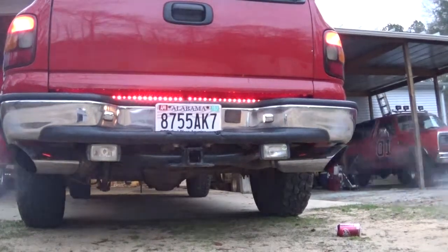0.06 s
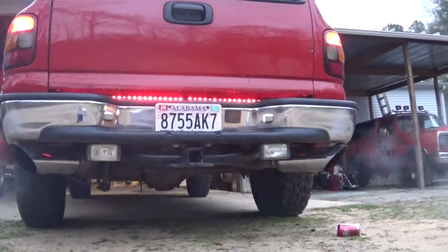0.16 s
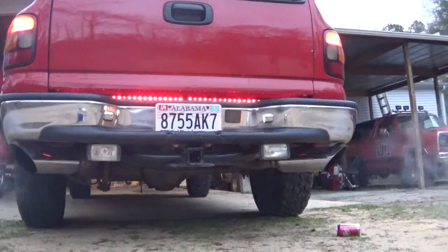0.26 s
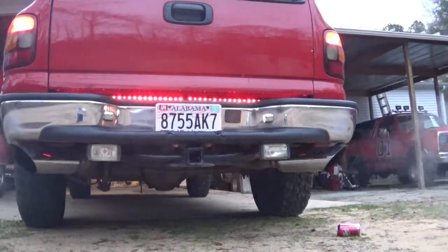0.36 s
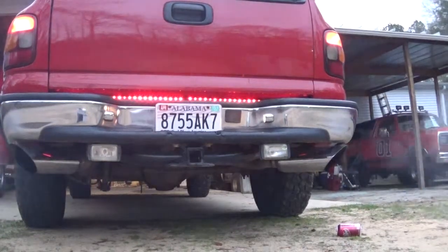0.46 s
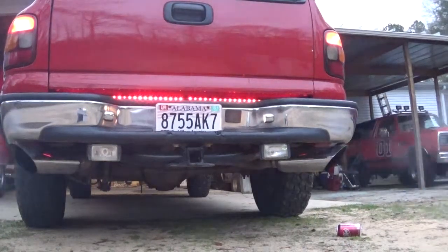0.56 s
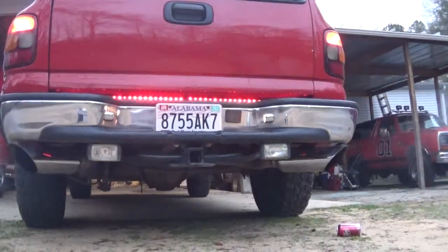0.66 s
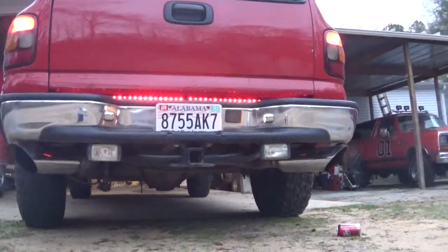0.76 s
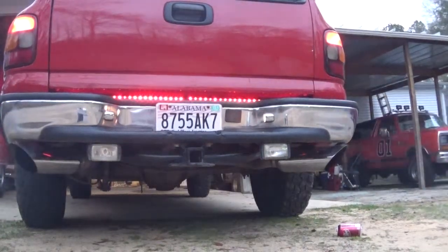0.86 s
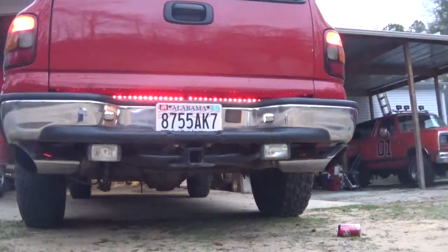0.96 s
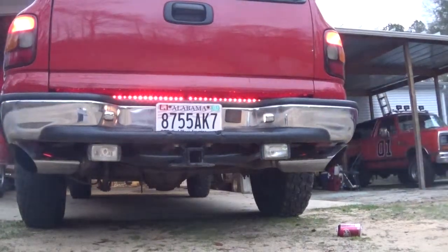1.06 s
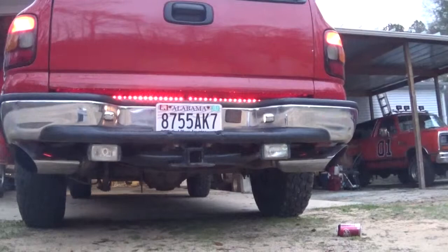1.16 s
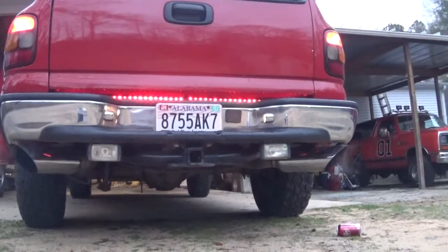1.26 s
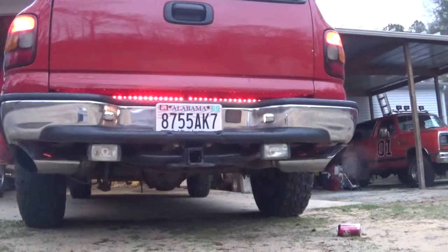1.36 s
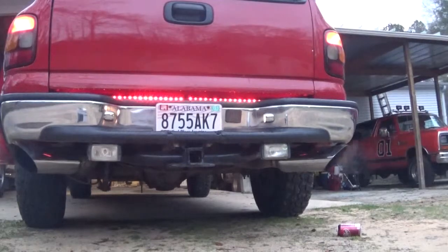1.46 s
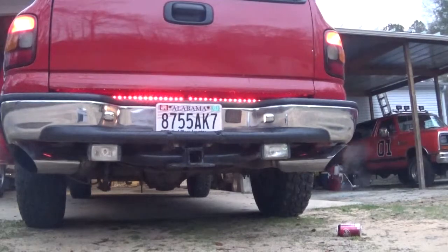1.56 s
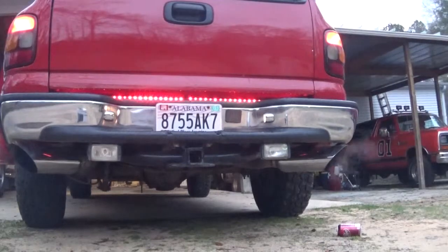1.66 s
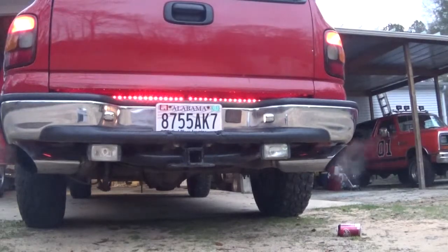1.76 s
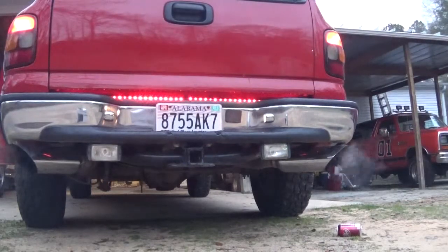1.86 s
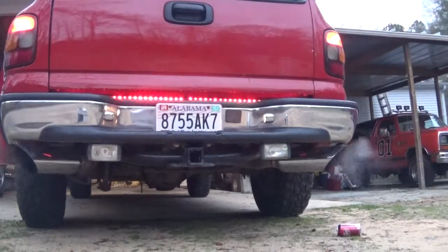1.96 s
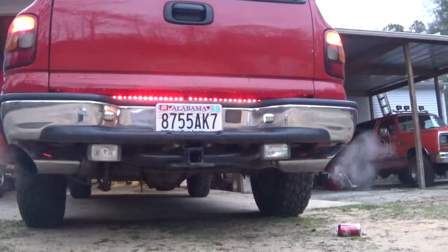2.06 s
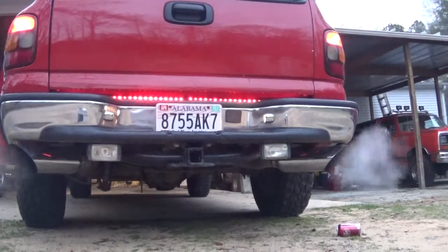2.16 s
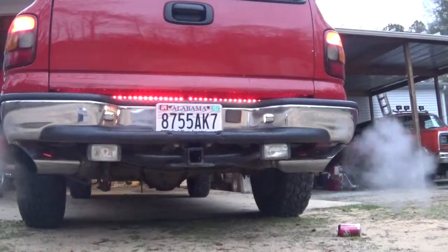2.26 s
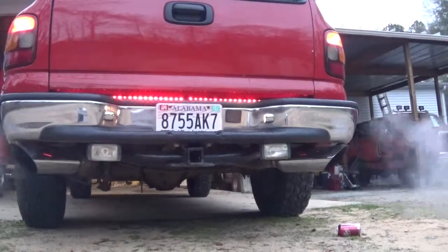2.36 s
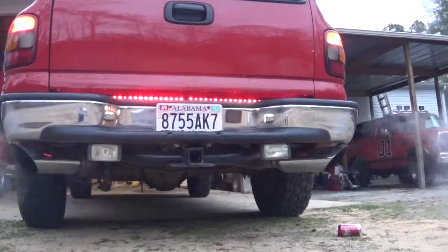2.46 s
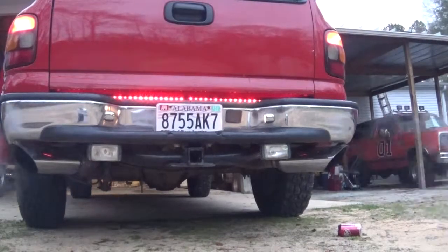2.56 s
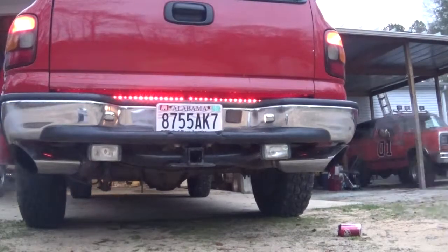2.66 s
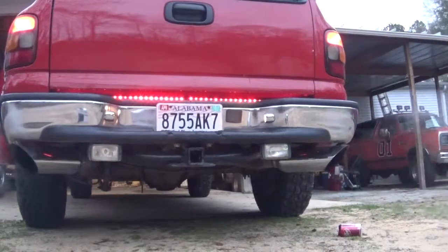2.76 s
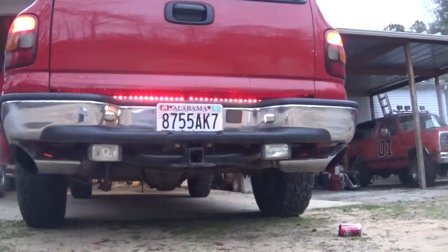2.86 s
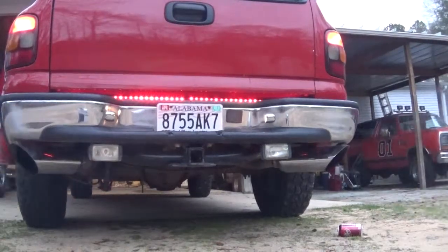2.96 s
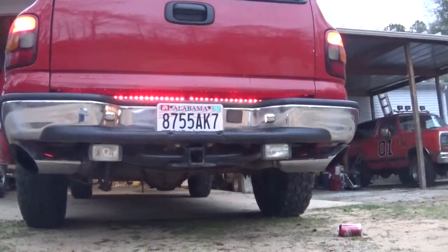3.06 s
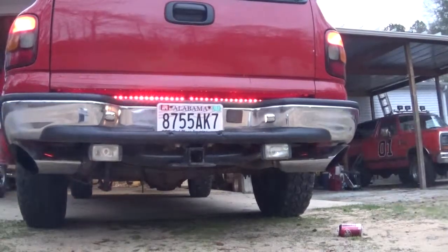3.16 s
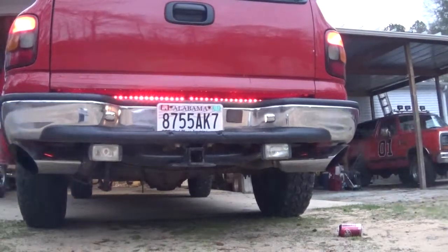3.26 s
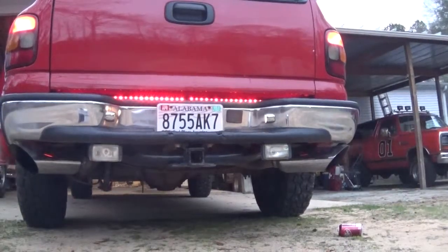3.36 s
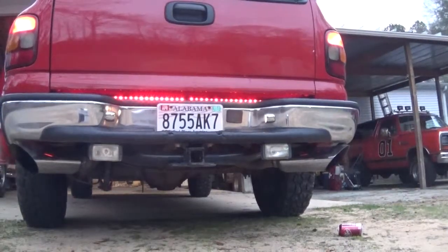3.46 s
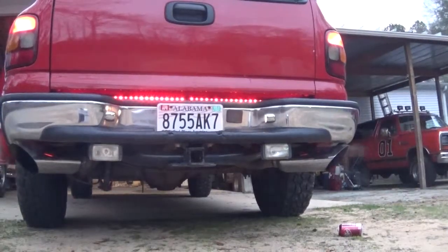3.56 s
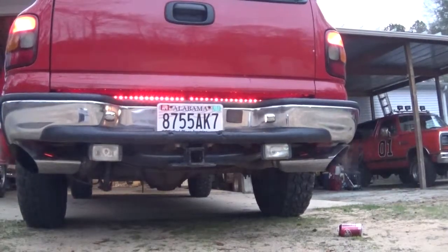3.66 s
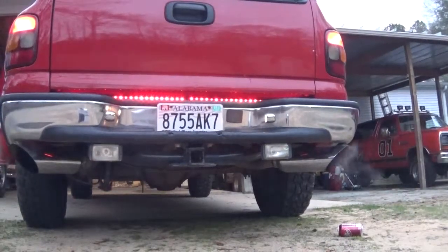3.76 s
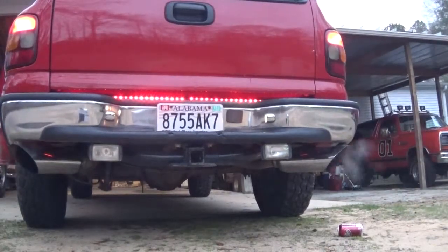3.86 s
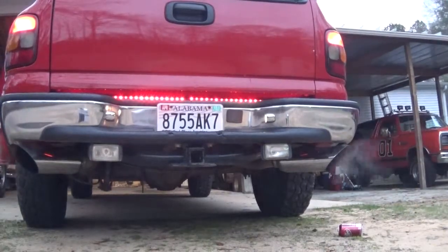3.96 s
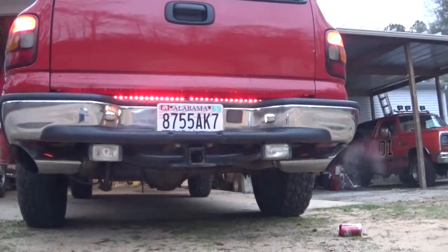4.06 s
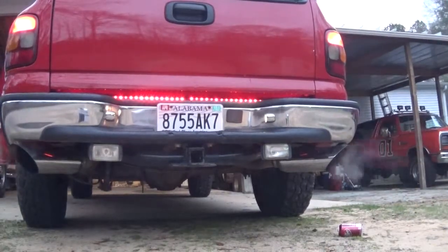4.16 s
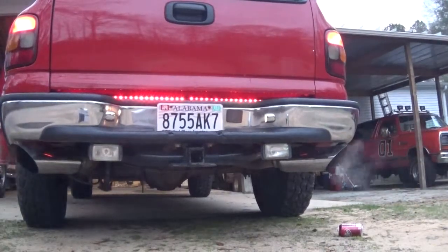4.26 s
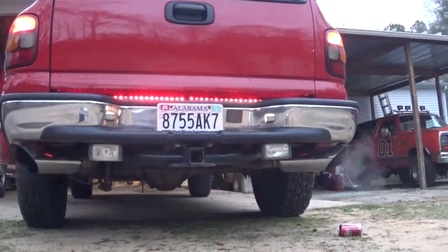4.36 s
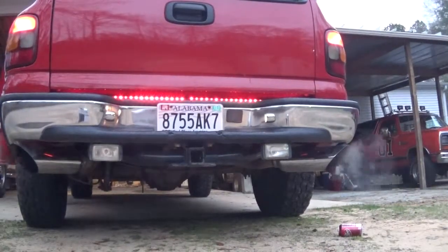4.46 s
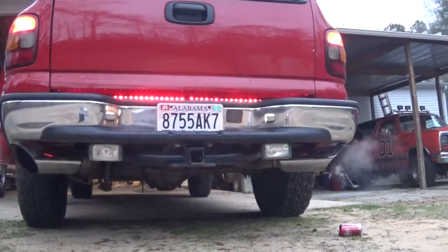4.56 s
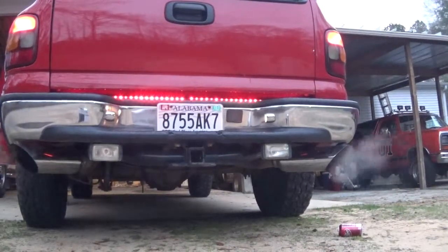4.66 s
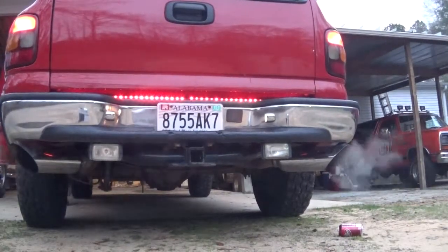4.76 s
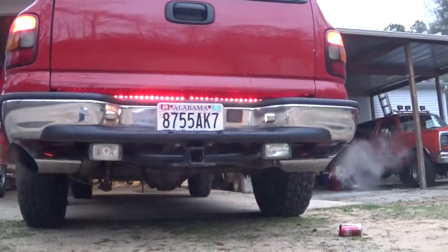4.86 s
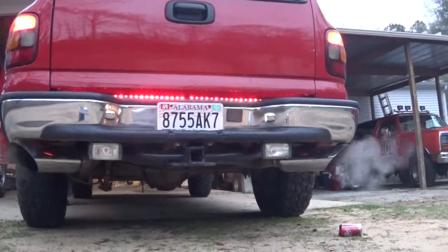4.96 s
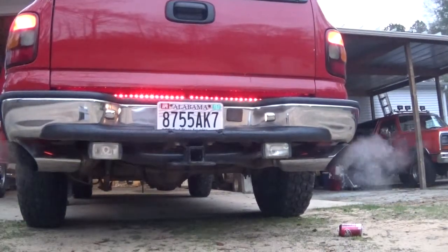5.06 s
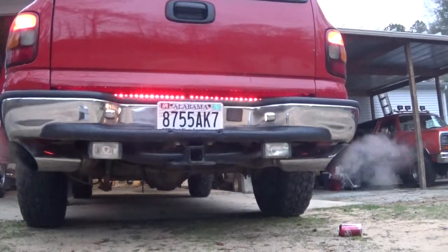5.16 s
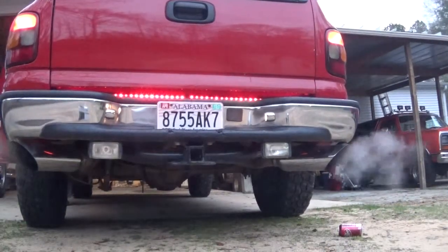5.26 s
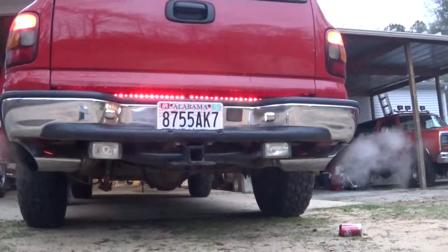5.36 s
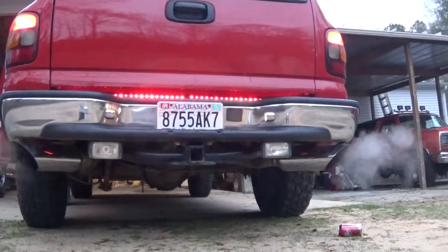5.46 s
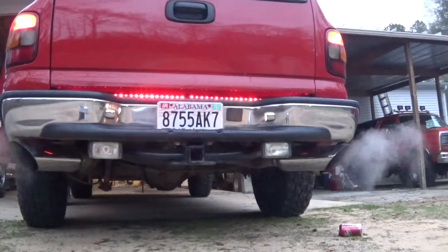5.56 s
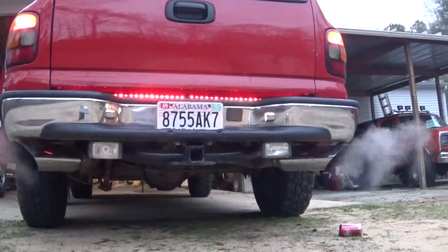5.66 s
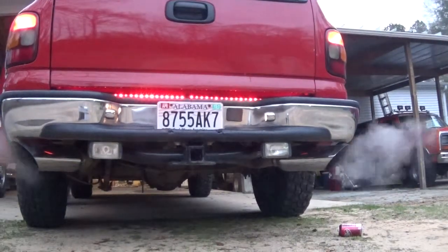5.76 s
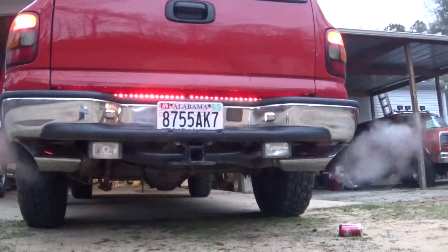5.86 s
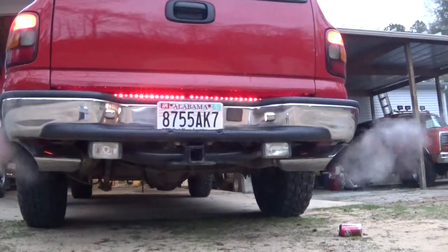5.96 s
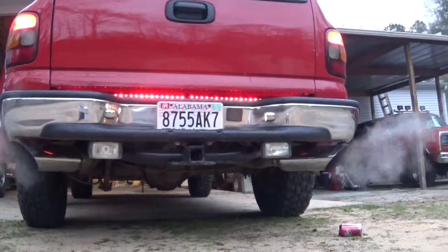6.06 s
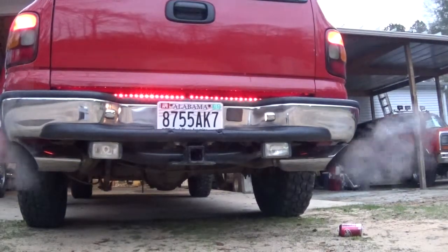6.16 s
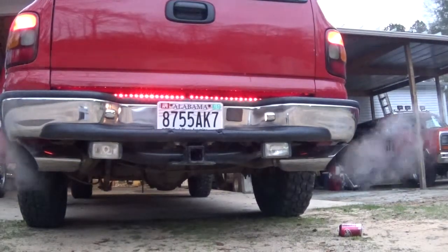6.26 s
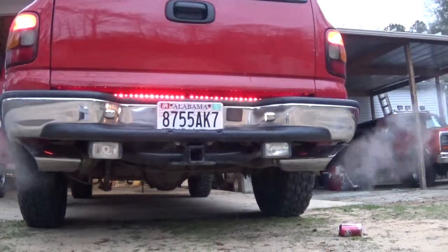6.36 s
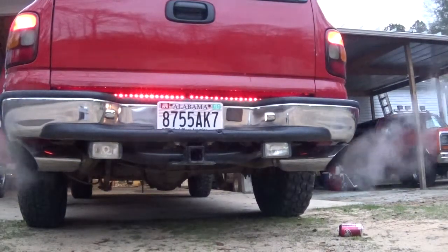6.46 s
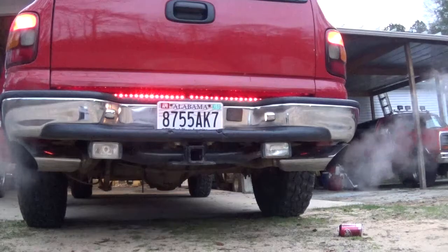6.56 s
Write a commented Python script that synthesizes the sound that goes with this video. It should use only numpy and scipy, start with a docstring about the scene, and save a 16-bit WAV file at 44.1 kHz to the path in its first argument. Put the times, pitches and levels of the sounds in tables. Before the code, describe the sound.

Heard from close behind in a yard, a V8 truck with two open pipes is already roaring at the top of a throttle blip. It rasps and crackles as the throttle lifts, burbles with deep pops, and drops to a fast, hissy idle. A second hard pull roars up with sharp cracks, then tumbles down through popping to a steady drone. Stereo microphone, left pipe slightly nearer, faint short reflections.

```python
"""A yard, behind a V8 truck with one open pipe per cylinder bank, on a stereo microphone.
Two throttle blips: a hard pull, a rasping overrun, a popping burble, then a fast idle.
Every firing sends a pressure pulse and a puff of turbulent gas out of its pipe; hiss and whirr fill between.
A sine follows the firing rate, single bangs go off in the pipes, and air pushes on the microphone."""
import sys
import numpy as np
from scipy import signal
from scipy.fft import rfft, irfft
from scipy.io import wavfile
from scipy.ndimage import uniform_filter1d

SR = 44100
rng = np.random.default_rng(int(sys.argv[2]) if len(sys.argv) > 2 else 0)


def transcribe(u):
    """Save the signal u as a 16-bit wav file named by the first command-line argument.

    u: samples, shape (n,) or (channels, n), limited to [-1, 1]; the rate is SR.
    q: integer samples, one column per channel.
    """
    v = np.clip(np.atleast_2d(u).T, -1, 1)
    q = np.round(v * 32767).astype(np.int16)
    wavfile.write(sys.argv[1], SR, q)


N = 291501
TIME = np.arange(N) / SR


def scene():
    """The truck's exhaust and its firing tone, the pops, and the rumble at the microphone."""
    return exhaust() + firing_tone() + pops() + rumble()


# Ranges of the exhaust, boom, bark, rasp, crack, top: [low f/Hz, high f/Hz]
RANGES_HZ = [(60, 450), (450, 870), (870, 2800), (2800, 6500), (6500, 12000)]
# Exhaust loudness through a blip; steeper pulses fill the upper ranges:
# [t/s from the lift, boom level/dB, bark level/dB, rasp level/dB, crack level/dB, top level/dB]
EXHAUST = [(-0.608, -27.5, -36.5, -44, -54, -56), (-0.5247, -26.5, -37, -33.5, -40, -54),
           (-0.4256, -17.5, -22, -19.5, -24, -42), (-0.4244, -19, -26, -23.5, -28.5, -49),
           (-0.3646, -22.5, -26, -21.5, -28, -38.5), (-0.1753, -18.5, -24, -22, -27.5, -36),
           (-0.1231, -18, -24.5, -19, -25.5, -38.5), (-0.0435, -18.5, -23.5, -24.5, -31.5, -44.5),
           (0.08, -21, -25.5, -24.5, -37, -44), (0.1372, -20, -26, -21, -28.5, -36.5),
           (0.2674, -19, -24, -20.5, -29.5, -38.5), (0.3656, -19.5, -22, -25.5, -40.5, -52.5),
           (0.61, -20.5, -21.5, -31, -46, -53), (0.8626, -20.5, -28, -38.5, -48, -53),
           (1.13, -23.5, -32.5, -41, -49, -54.5), (1.5, -30.5, -37.5, -43, -52, -56.5),
           (2, -32, -39.5, -44.5, -53, -57.5), (2.5, -31.5, -39, -45.5, -52.5, -57.5),
           (3.5, -26, -36, -43, -49.5, -54.5)]
# Colour of the pipes, relative: [f/Hz, level/dB per Hz]
PIPE = [(24, -55), (40, -24), (87, -25.5), (217, -3), (295, -3), (440, -9.5), (755, -6.5), (1020, -18.5),
        (1640, -11), (3170, -32), (3730, -28.5), (5700, -35.5), (9550, -40), (11000, -39), (14300, -61),
        (22000, -120)]
# Pipe resonances: [f/Hz, width f/Hz, lift level/dB]
PIPE_MODES = [(157.2, 68, 8), (219.7, 25.5, 6), (283, 77, 6), (314.7, 31, 5), (403, 23, 6), (523, 220, 7),
              (741, 33, 6.5), (793, 51, 4.5), (1630, 14, 7), (2430, 200, 6), (3540, 82, 5), (5720, 450, 8),
              (8530, 1200, 10)]
# Narrow resonance that takes over as the gas cools at idle: [t/s from the lift, level/dB against plain boom]
IDLE_RING = [(-0.5, -5), (2, -20), (2, -10), (3, 5.5), (5, -7)]
# The deepest multiples of the engine cycle come forward at idle: [t/s from the lift, level/dB]
DEEP = [(-.6, -49), (-.3, -64), (1, -54), (1.5, -52.5), (2.5, -49), (3.5, -45.5)]
RING_HZ, RING_WIDTH_HZ = 271, 26
BEAD_HZ, BEAD_WIDTH_HZ, BEAD_DB = 765, 91, -1   # a higher resonance rings with the narrow one
LULL_S, LULL_DB = (-.025, .06), 9   # around the lift the fronts sink into the hiss (t/s from the lift)
PUFF_DB, CRACK_PUFF_DB = -22, -11


def exhaust():
    """The lowest range carries drone and push, the others the steep fronts; hiss fills between."""
    turns = crank_turns()
    push, snap, crack = firings(turns)
    snap, crack = with_puff(snap, PUFF_DB), with_puff(crack, CRACK_PUFF_DB)
    sources = np.array([drone(turns), in_yard(push), in_yard(snap), in_yard(crack)])
    clean, push, snap, crack = coloured(sources, PIPE, PIPE_MODES)
    hiss = flow_hiss()
    drone_db, *hiss_db = by_kind(MANNER)[3:]

    ring = from_db(in_time(IDLE_RING)[0])
    boom = from_db(drone_db) * evened(band(clean, *RANGES_HZ[0])) + evened(band(push, *RANGES_HZ[0]))
    boom = evened(boom) + ring * evened(resonance(boom, RING_HZ, RING_WIDTH_HZ))
    bead = evened(resonance(snap, BEAD_HZ, BEAD_WIDTH_HZ))
    bark = evened(part(snap, *RANGES_HZ[1])) + ring * from_db(BEAD_DB) * bead
    upper = [part(x, *edges) for x, edges in zip([snap, crack, crack], RANGES_HZ[2:])]

    near_lift = (from_lift() > LULL_S[0]) & (from_lift() < LULL_S[1])
    lull_db = uniform_filter1d(LULL_DB * near_lift, size=400)
    out = from_db(in_time(DEEP)[0]) * evened(band(clean, 100, 164))
    for pulses, level_db, db, edges in zip([boom, bark, *upper], in_time(EXHAUST), hiss_db, RANGES_HZ):
        fronts = from_db(-lull_db * (edges[0] > 800)) * evened(pulses)   # boom and bark do not sink
        steady = from_db(db) * evened(band(hiss, *edges))
        out = out + from_db(level_db) * (fronts + steady) / np.hypot(1, from_db(db))
    return out


# Crank speed through a blip: [t/s from the lift, firings per s]
SPEED = [(-.64, 92.5), (-.6, 92), (-.525, 102), (-.45, 119), (-.3, 164.5), (-.15, 222), (-.075, 247.5),
         (0, 255), (.075, 246.5), (.15, 235), (.34, 215), (.5, 191), (.8, 162), (1.1, 135.3), (1.3, 120.3),
         (1.7, 100), (2.1, 87.6), (2.5, 80.5), (3.0, 79), (3.91, 78.8)]


def crank_turns():
    """Running count of firings: the firing rate summed over time."""
    return np.cumsum(in_time(SPEED)[0]) / SR


# Per kind of running: [lateness in firings, push scatter level/dB, front scatter level/dB,
# clean drone level/dB, then hiss level/dB against the pulses in each of the five ranges]
MANNER = {"pull": (-.7, 2.5, 1.7, 5, -12, -7, -4, -3, -2),
          "overrun": (.25, 3, 1.2, 6, -13, -9, -11, -9, -7), "burble": (.3, 5, 2.5, 3, -14, -9, -4, 5, 8),
          "idle": (.15, 2, .8, 12, -14, -2, 3, 10, 10)}
# Per kind, unevenness in firings: [crank's turning, which blurs the higher multiples; each firing's moment]
WOBBLE = {"pull": [.035, .02], "overrun": [.035, .02], "burble": [.075, .05], "idle": [.012, .012]}
# Per kind: place in the eight-firing cycle [count]
FIRST_SLOT = {"pull": 7, "overrun": 7, "burble": 7, "idle": 2}
# Bank of each of the eight firings: [1 left, 0 right]
LEFT_BANK = [1, 0, 1, 0, 0, 1, 0, 1]
# Per kind, the eight cylinders' fronts in the middle ranges: [level/dB of each]
SNAP = {"pull": [0, 0, 4, -2, -5, 3, -2, 3], "overrun": [1, -6, 5, -4, -8, 5, 0, 4], "burble": [3, 0, 0, 0,
        -4, -2, 4, 2], "idle": [1.5, -3, -1.5, -9, -5, -2.5, -6.5, -1]}
# Per kind, the eight cylinders' fronts in the treble: [level/dB of each]
CRACK = {"pull": [0, 0, 3, -2, -4, 5, -2, 1], "overrun": [-3, -6, 2, -4, -7, 1, 3, 3], "burble": [3, 0, 0,
         0, -4, -2, 4, 2], "idle": [-1, -2, -4, 4, -6, 2, -6, -2]}


def firings(turns):
    """Pressure pulses as click trains per bank: the low push, the steep fronts and their treble."""
    count = np.arange(int(turns[-1]))
    kinds = kind_at(np.interp(count, turns, TIME))
    luck = rng.standard_normal((len(count), 4))
    push, snap, crack = np.zeros((3, 2, N))
    for n, kind, (a, b, c, d) in zip(count, kinds, luck):
        cylinder = (n - FIRST_SLOT[kind]) % 8
        lateness, low_db, sharp_db = MANNER[kind][:3]
        at = min(np.searchsorted(turns, n + lateness + WOBBLE[kind][1] * c), N - 1)
        bank = 1 - LEFT_BANK[cylinder]
        # shared draws: a strong push tends to have a strong front, a strong front a strong treble
        push[bank, at] += from_db(low_db * a)
        snap[bank, at] += from_db(SNAP[kind][cylinder] + sharp_db * (a + b) * .7)
        crack[bank, at] += from_db(CRACK[kind][cylinder] + sharp_db * (b + d) * .8)
    return push, snap, crack


PUFF_S = .002   # time constant


def with_puff(clicks, puff_db):
    """Each front drags a short, exponentially dying burst of turbulence behind it."""
    tail = signal.lfilter([1], [1, -np.exp(-1 / (PUFF_S * SR))], clicks + 1e-18)
    return clicks + from_db(puff_db) * tail * rng.standard_normal(clicks.shape)


# The uneven beat of each bank favours some multiples of the engine cycle.
# Per kind: [level/dB by the multiple's remainder after division by eight]
DRONE = {"pull": [-2, -5.5, -2.5, 3.5, -4, -5, -2.5, -4.5], "overrun": [-3, -3, -7, 6.5, -2.5, -26, -7,
         -22], "burble": [1.5, 4, -3.5, 5.5, 1.5, 7, 1, 0.5], "idle": [-3.5, -5, -2, 6, -5.5, -3.5, 0,
         -1.5]}
# Per kind: [lateness in firings, left-right level/dB]
DRONE_PLACE = {"pull": (3.5, 8.5), "overrun": (3.5, 7.8), "burble": (4., 8.6), "idle": (4.5, 2.3)}
DRONE_LAG_S, SPREAD_RAD = .00019, .39   # left side's lag; phase per squared multiple


def drone(turns):
    """The repeating beat: multiples of the eight-firing cycle, spread in time by the long pipes."""
    gains, phases = from_db(by_kind(DRONE)), np.angle(np.fft.fft(LEFT_BANK))
    sway = band(rng.standard_normal(N), 4, 20)
    lateness, pan_db = by_kind(DRONE_PLACE)
    cycles = (turns - lateness + by_kind(WOBBLE)[0] * sway / sway.std()) / 8
    beat = np.zeros(N)
    for k in range(3, 46):
        phase = phases[k % 8] + SPREAD_RAD * k * k
        beat += gains[k % 8] * np.cos(2 * np.pi * k * cycles + phase)
    left, right = panned(beat, pan_db)
    return np.array([late(left, DRONE_LAG_S), right])


# Colour of fan, belts and gas flow, relative: [f/Hz, level/dB per Hz]
WHIRR = [(24, -100), (40, -54), (64, -61), (149, -10.5), (193, -14), (268, -1.5), (340, -17.5),
         (543, -31.5), (755, -42), (1050, -29.5), (2690, -39.5), (8900, -54.5), (11000, -57.5),
         (14300, -84), (22000, -120)]
# Their resonances: [f/Hz, width f/Hz, lift level/dB]
WHIRR_MODES = [(388, 10, 4), (690, 68, 15), (1510, 160, 0.5), (2393, 17, 6.5), (2760, 22, 10.5)]
HISS_LIKENESS, HISS_PAN_DB = .81, 1   # likeness of the two sides, 0 to 1


def flow_hiss():
    """Steady turbulence in the pipes and engine whirr: coloured noise, partly alike on both sides."""
    mid, side = rng.standard_normal((2, N))
    both = np.sqrt(1 + HISS_LIKENESS) * mid + np.sqrt(1 - HISS_LIKENESS) * side * [[1], [-1]]
    return coloured(panned(both, HISS_PAN_DB), WHIRR, WHIRR_MODES)


# Pure tones at the firing rate and at twice it: [t/s from the lift, rms level/dB, octave rms level/dB]
FIRING_TONE = [(-.64, -54, -55), (-.52, -40, -38), (-.45, -31, -22), (-.36, -32, -22), (-.27, -33, -42),
               (-.12, -28, -50), (0, -30, -50), (.1, -45, -50), (.45, -40, -50), (.8, -42, -48),
               (1.2, -45, -46), (1.6, -50, -50), (2.3, -62, -50), (3.9, -56, -50)]
TONE_PAN_DB = 4.5


def firing_tone():
    """A clean sine, one cycle per firing, and its octave."""
    turns = crank_turns()
    tone_db, octave_db = in_time(FIRING_TONE)
    tone = from_db(tone_db) * np.cos(2 * np.pi * turns)
    octave = from_db(octave_db) * np.cos(4 * np.pi * turns)
    return panned(np.sqrt(2) * (tone + octave), TONE_PAN_DB)


# Loud single cracks and pops of unburnt fuel, before the trims below:
# [t/s, peak level/dB, treble level/dB against the peak, pipe 0 left to 1 right]
POPS = [(.0194, -12.5, -5.5, 0), (.0917, -19, 6, 0), (.2983, -13.5, -6.5, 0.27), (.321, -12.5, -27, 1),
        (.3307, -13, -20, 0), (.3551, -13, 1, 1), (.3645, -12.5, -1, 0), (.3891, -12, -4, 1),
        (.3945, -19, 3, 0), (.4454, -13, 0, 0), (.468, -18.5, 0.5, 0), (.4805, -15, -1, 0),
        (.5038, -28, -9, 0), (.535, -20, 1.5, 1), (.5412, -14.5, 0.5, 0), (.5781, -12.5, -12, 0),
        (.6174, -13, -32, 0), (.6505, -9.5, -34, 1), (.6617, -18, -27, 0), (.6912, -8, -27, 1),
        (.7031, -7, -14, 0), (.7334, -7, -27, 1), (.7452, -10.5, -12.5, 0), (.7712, -7, -26, 0.19),
        (.7767, -12.5, -26, 1), (.7888, -8, -19.5, 0), (.8155, -14, -22, 0.91), (.8276, -17, -25, 0),
        (.86, -16, -24, 0.9), (.8735, -17, -28, 0), (.912, -33, -22, 1), (1.0765, -18.5, -18, 0),
        (1.097, -19, -22, 0.88), (1.1145, -24, -27, 0.22), (1.1503, -20, -22, 0.9), (1.1695, -21, -22, 0.2),
        (1.2595, -36, -18, 0), (1.3395, -26.5, -15, 0.18), (1.3855, -26.5, -18, 0.64),
        (1.4505, -28, -18, 1), (1.5185, -37, -18, 1), (2.1567, -16, -17, 0.31), (2.1856, -26, -7, 1),
        (2.2031, -17, -4, 0.16), (2.231, -18, -10, 0.083), (2.271, -16.5, -5, 0), (2.4022, -11, 2.5, 0),
        (2.414, -20, 3, 0), (2.4475, -19, 4, 0), (2.4888, -23, 11, 0), (2.5265, -22, 8, 0),
        (2.5485, -18, 1, 0), (2.58, -13.5, 3.5, 1), (2.606, -14, -4, 0.13), (2.618, -11.5, -4, 0),
        (2.676, -18, -14, 0), (2.7652, -10, -11, 1), (2.7708, -18.5, -0.5, 0.12), (2.7936, -5, -15, 0.41),
        (2.7979, -16, -3, 1), (2.8033, -15, -4, 0), (2.8275, -17, 0, 0.094), (2.831, -20, 4, 1),
        (2.8369, -12, -0.5, 0.12), (2.8605, -9, -8, 0), (2.8646, -23, 3, 1), (2.8813, -29, -3, 0),
        (2.8988, -16, -12, 1), (2.9047, -16.5, -2, 0), (2.9161, -12.5, -1.5, 0), (2.9395, -22, -7, 0.083),
        (2.9514, -28, -7, 0), (2.9755, -10, -6.5, 0), (2.9887, -13, -7, 0), (3.0054, -13, -20, 1),
        (3.0112, -12, -6, 0.21), (3.0486, -17, -11, 0), (3.0672, -20, -17, 0), (3.0806, -19, -25, 1),
        (3.0908, -10, -28, 0), (3.12, -9.5, -27, 1), (3.1265, -21, -11, 0), (3.1604, -10, -26, 1),
        (3.1665, -10, -27, 0.14), (3.1972, -7, -29, 0), (3.2016, -15.5, -28, 1), (3.2226, -10, -24, 0.11),
        (3.2435, -15, -28, 1), (3.2498, -19, -22, 0), (3.2937, -14, -33, 0.19), (3.3311, -12.5, -30, 0.9),
        (3.3384, -16, -31, 0), (3.3837, -20, -32, 0), (3.4305, -23.5, -14, 0), (3.4727, -13, -29, 0.8),
        (3.5345, -20.5, -21, 0), (3.5555, -28, -20, 1), (3.5725, -27, -19, 1), (3.591, -27, -22, 0.2),
        (3.6245, -22, -23, 1), (3.6785, -30, -15, 0.85), (3.7475, -26, -18, 0.31),
        (3.8283, -31, -13, 0.089), (3.8672, -27.5, -23, 0), (4.0157, -27, -19, 0),
        (4.152, -27.5, -18, 0.22), (4.378, -38, -24, 0.49)]
POP_PAN_DB = (6, -1)   # left pipe, right pipe
POP_DB, POP_LOW_DB, POP_KNOCK_DB, POP_TREBLE_DB, POP_PUFF_DB = 1.5, -7.5, -5, 3.5, -12
# later pops in the run-down are deeper (t/s from the lift)
THUD_GROWS_DB_PER_S, THUD_FROM_S, THUD_GROWS_S = 40, .56, .46


def pops():
    """Single bangs in the pipe: a thud, a knock, a sharp middle and, on some, a bright crack."""
    s, db, treble_db, pipe = np.vstack([POPS, small_pops()]).T
    at = np.round(s * SR).astype(int)
    bang, crack, pan = np.zeros((3, N))
    bang[at] = from_db(db + POP_DB)
    crack[at] = from_db(db + treble_db + POP_TREBLE_DB)
    pan[at] = np.interp(pipe, (0, 1), POP_PAN_DB)
    puff = with_puff(crack, POP_PUFF_DB) - crack
    bang_sides = with_echoes(panned(bang, pan))
    crack_sides = with_echoes(panned(crack, pan) + panned(puff, BANK_PAN_DB[0]))
    click = np.zeros((2, N))
    click[:, 2000] = 1   # a lone click, whose peak in each range sets that range's gain
    # no resonances: pops are too short to wake the narrow ones
    click, bang, crack = coloured(np.array([click, bang_sides, crack_sides]), PIPE, [])
    thud_db = POP_LOW_DB + THUD_GROWS_DB_PER_S * np.clip(from_lift() - THUD_FROM_S, 0, THUD_GROWS_S)
    layers = [(bang, thud_db, (150, 450)), (bang, POP_KNOCK_DB, (450, 900)),
              (bang, 0, (900, 2800)), (crack, 0, (2800, 11500))]
    out = 0
    for x, part_db, edges in layers:
        out = out + from_db(part_db) * part(x, *edges) / np.abs(part(click[0], *edges)).max()
    return out


SMALL_POPS_FROM_S, SMALL_POPS_TO_S, SMALL_POPS_PER_S = .38, 1.5, 8   # t/s from the lift
SMALL_POP_DB, SMALL_POP_FADE_DB_PER_S, SMALL_POP_TREBLE_DB = -21, 16, -18   # before the pop trims


def small_pops():
    """Fainter pops at random in the run-down, fading: rows like those of the loud pops."""
    since = from_lift()
    chance = rng.random(N) < SMALL_POPS_PER_S / SR
    at = np.flatnonzero(chance & (since > SMALL_POPS_FROM_S) & (since < SMALL_POPS_TO_S))
    db = SMALL_POP_DB - SMALL_POP_FADE_DB_PER_S * (since[at] - SMALL_POPS_FROM_S)
    right_pipe = rng.standard_normal(len(at)) > .4   # about one in three
    return np.transpose([TIME[at], db, np.full(len(at), SMALL_POP_TREBLE_DB), right_pipe])


BANK_PAN_DB = (7.5, -2.5)   # left pipe, right pipe
RIGHT_PIPE_LAG_S = .000404


def in_yard(banks):
    """Both pipes placed left and right before the microphone, the right one farther off."""
    left_pipe = panned(banks[0], BANK_PAN_DB[0])
    right_pipe = panned(late(banks[1], RIGHT_PIPE_LAG_S), BANK_PAN_DB[1])
    return with_echoes(left_pipe + right_pipe)


# Reflections from ground, tailgate and shed: [t/s, level/dB]
ECHOES = [(.0031, -15), (.0074, -17), (.017, -20), (.029, -21)]
LEFT_EAR_LAG_S = .00001


def with_echoes(both):
    """A few reflections, arriving a little later on the right."""
    mid = both.mean(axis=0)
    left = late(both[0], LEFT_EAR_LAG_S) + sum(from_db(db) * late(mid, s) for s, db in ECHOES)
    right = both[1] + sum(from_db(db) * late(mid, 1.03 * s) for s, db in ECHOES)
    return np.array([left, right])


# Air pushing on the microphone through a blip, mean: [t/s from the lift, level/dB]
RUMBLE = [(-.6, -67), (-.45, -49), (0, -54), (.3, -52), (.6, -75), (.9, -52), (1.15, -61), (1.35, -71),
          (2.5, -72), (3.9, -72)]
RUMBLE_LUMPS_DB = 2   # rms swing


def rumble():
    """Dull lumps of air at the microphone: low noise swelling slowly, mostly common to both sides."""
    mid, side, slow = rng.standard_normal((3, N))
    lumps = signal.sosfilt(signal.butter(1, [3, 9], "band", fs=SR, output="sos"), slow)
    level_db = in_time(RUMBLE)[0] + RUMBLE_LUMPS_DB * lumps / lumps.std()
    air = panned(mid, 2.5) + .3 * side * [[1], [-1]]
    return from_db(level_db) * evened(band(air, 32, 72))


# Throttle blips: [t/s at which the foot lifts, pace of the run-down after it]
BLIPS = [(.223, 1.048), (2.7, 1.0)]
PULL_S = .64   # the throttle opens this long before the lift


def from_lift():
    """Seconds from the lift of the blip under way, at its own pace once the foot is off."""
    lifts, paces = np.transpose(BLIPS)
    blip = np.maximum(np.searchsorted(lifts - PULL_S, TIME) - 1, 0)
    s = TIME - lifts[blip]
    return np.where(s > 0, s * paces[blip], s)


def in_time(rows):
    """Columns of a blip table, one value per sample."""
    s, *columns = np.transpose(rows)
    return [np.interp(from_lift(), s, c) for c in columns]


# Phases of running: [start t/s, kind]
PHASES = [(0, "pull"), (.27, "overrun"), (.6, "burble"), (1.4, "idle"), (2.09, "pull"), (2.74, "overrun"),
          (3.08, "burble"), (3.95, "idle")]


def kind_at(s):
    """Kind of running at each time."""
    starts, kinds = zip(*PHASES)
    return np.array(kinds)[np.searchsorted(starts, s, "right") - 1]


def by_kind(table):
    """Columns of a per-kind table in time, gliding from kind to kind."""
    rows = np.array([table[k] for k in kind_at(TIME[::100])], float)   # every 100th sample
    rows = uniform_filter1d(rows, size=25, axis=0)
    return np.repeat(rows, 100, axis=0)[:N].T


def coloured(x, spectrum, modes):
    """Causal (minimum-phase) filter with a spectrum and resonances, by way of the cepstrum."""
    size = 5 * 2 ** 16
    hz = np.maximum(np.fft.rfftfreq(size, 1 / SR), 10)
    spectrum_hz, spectrum_db = np.transpose(spectrum)
    db = np.interp(np.log(hz), np.log(spectrum_hz), spectrum_db)
    for mode_hz, width, lift_db in modes:
        db = db + lift_db / (1 + (2 * (hz - mode_hz) / width) ** 2)
    cepstrum = irfft(db * np.log(10) / 20)
    cepstrum[1:size // 2] *= 2   # fold the negative times onto the positive
    cepstrum[size // 2 + 1:] = 0
    return irfft(rfft(x, size) * np.exp(rfft(cepstrum)))[..., :N]


def resonance(x, hz, width_hz):
    """Two-pole band-pass, gain about 1 on top."""
    r = np.exp(-np.pi * width_hz / SR)
    poles = [1, -2 * r * np.cos(2 * np.pi * hz / SR), r * r]
    return signal.lfilter([(1 - r * r) / 2, 0, (r * r - 1) / 2], poles, x)


def band(x, low_hz, high_hz):
    """Butterworth band-pass."""
    return signal.sosfilt(signal.butter(3, [low_hz, high_hz], "band", fs=SR, output="sos"), x)


def part(x, low_hz, high_hz):
    """A range without phase shift: neighbouring ranges add up to one steep pulse again."""
    return signal.sosfiltfilt(signal.butter(2, [low_hz, high_hz], "band", fs=SR, output="sos"), x)


def evened(x):
    """Running rms of the two channels' mean brought to 1."""
    power = uniform_filter1d(uniform_filter1d(x.mean(axis=0) ** 2, size=4400), size=4400)
    return x / np.sqrt(power + 1e-12)


def panned(x, pan_db):
    """Left-right level step, left louder when positive; mono becomes stereo."""
    return x * from_db(np.multiply.outer([.5, -.5], pan_db * np.ones(N)))


def late(x, seconds):
    """Delay by interpolated reading."""
    return np.interp(TIME - seconds, TIME, x, left=0)


def from_db(db):
    """Decibels to gain."""
    return 10 ** (np.asarray(db) / 20)


CUTOFF_HZ = 12000   # 60 dB down from here up


def record(dry):
    """Peaks are rounded, the top is cut."""
    rounded = .8 * np.tanh(dry / .8)
    return signal.sosfilt(signal.cheby2(12, 60, CUTOFF_HZ, fs=SR, output="sos"), rounded)


dry = scene()
out = record(dry)
transcribe(out)
```